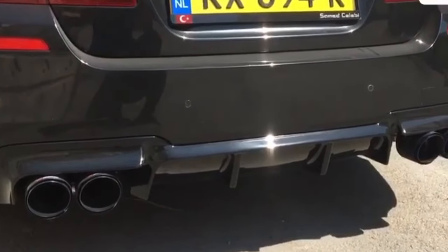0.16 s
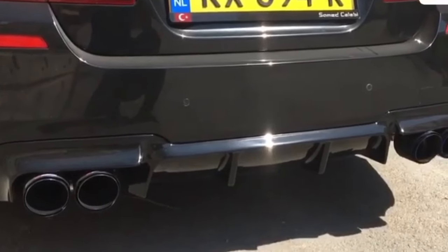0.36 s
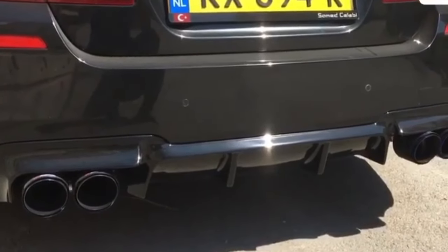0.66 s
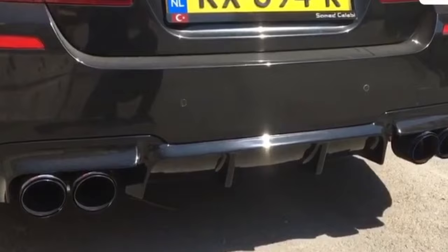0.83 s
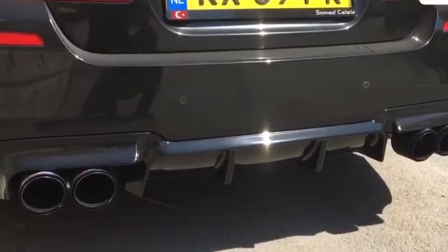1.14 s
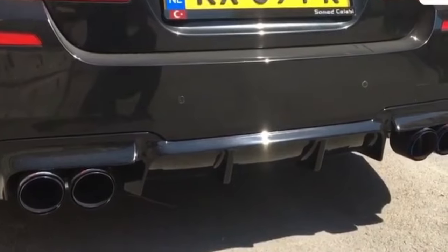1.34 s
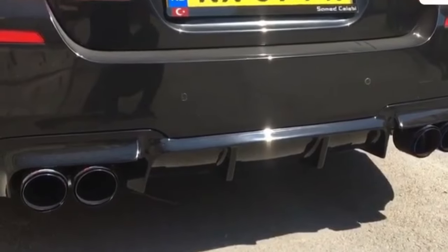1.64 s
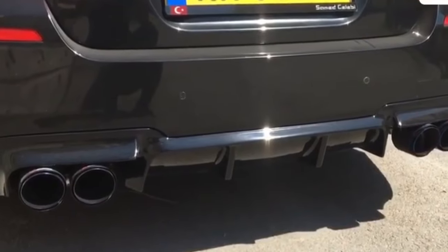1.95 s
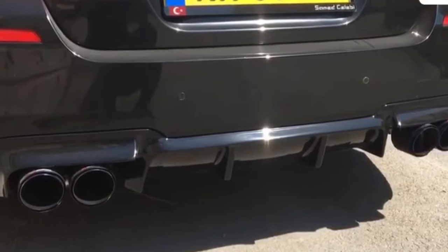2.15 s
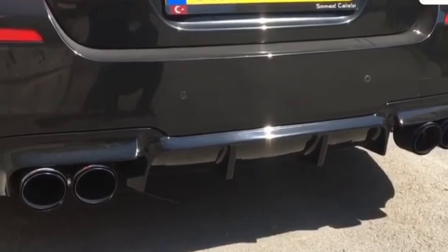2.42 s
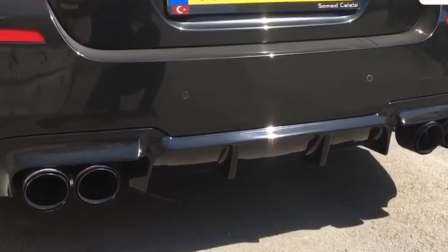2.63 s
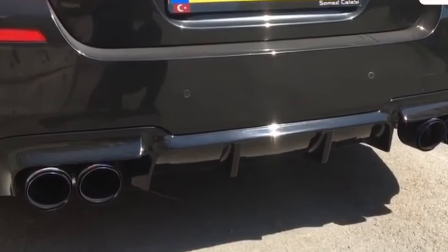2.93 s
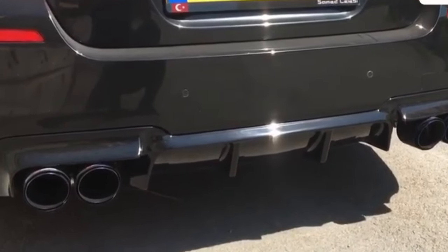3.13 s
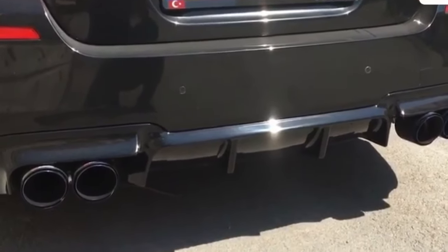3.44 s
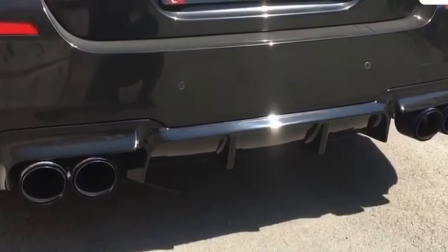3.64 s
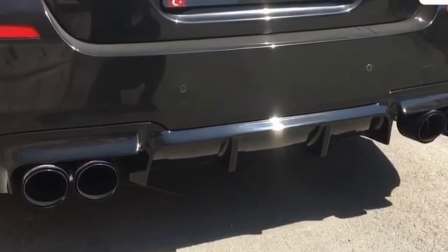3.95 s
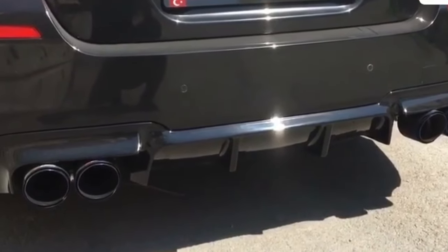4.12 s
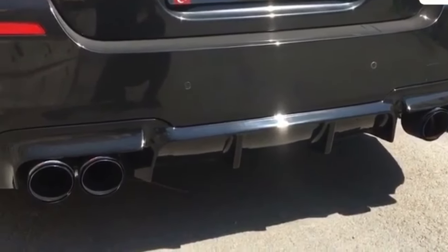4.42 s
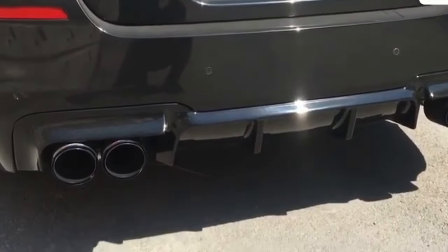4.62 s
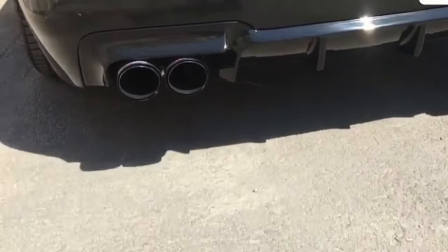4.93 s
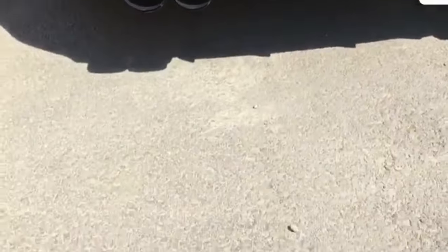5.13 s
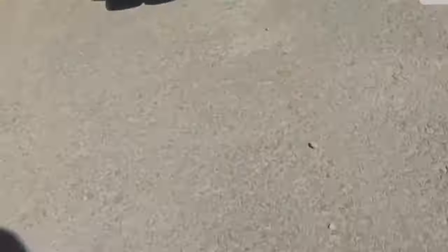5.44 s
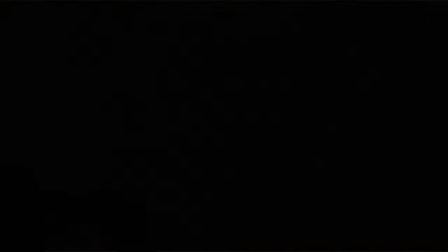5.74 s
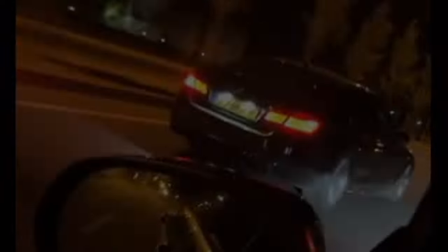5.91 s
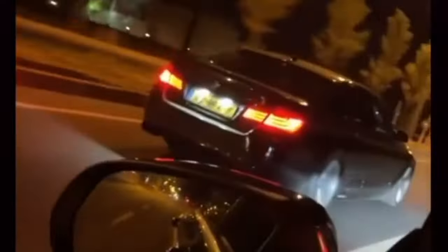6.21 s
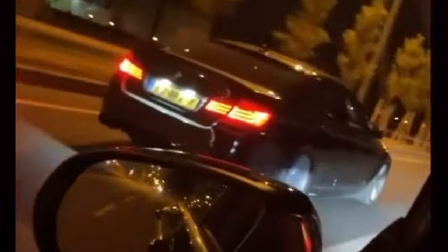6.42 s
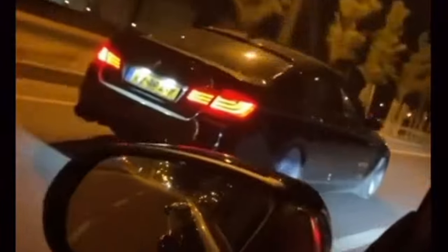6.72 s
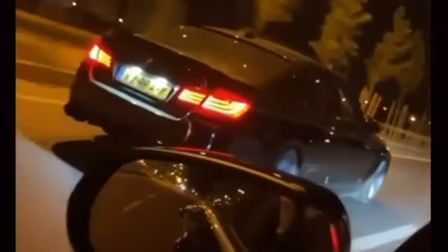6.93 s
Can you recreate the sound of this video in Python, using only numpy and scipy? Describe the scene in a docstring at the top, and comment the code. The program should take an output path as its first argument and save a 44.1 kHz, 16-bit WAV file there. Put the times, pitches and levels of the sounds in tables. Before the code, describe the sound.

From the start, a six-cylinder car idles with the microphone close to the tailpipes. The sound is a deep, loping throb, each pulse carrying a soft puff of gas and a hollow knock over a low burble. The revs sink slowly, and from about 3.5 seconds the idle is lower and more uneven. Between 5.4 and 6.4 seconds it crossfades to the same car on the road, heard from a car alongside. The engine drones and rises slightly as it pulls, with broad road roar, a bright flickering hiss with faint breathy whistles, and low wind rumble. From 5.9 seconds the exhaust fires about a dozen irregular pops, each a crack with a thump, quickly growing loud. Gusts buffet the microphone from 6.3 seconds, and a stone clicks once on the bodywork near 6.4. The throttle lifts at 6.8 seconds, and pops continue until the end, just after 7.

```python
"""A deep, loping six-cylinder idle, with the microphone close to the tailpipes. Each firing pulses through
the pipe resonances and leaves a puff of gas and a hollow knock; the revs slowly sink.
After five seconds the scene fades to the same car on the road, heard from a car alongside: engine orders,
road roar, bright hiss, wind buffeting the microphone, pops of unburnt fuel and one stone on the bodywork."""
import sys
import numpy as np
from scipy import signal
from scipy.io import wavfile

SR = 44100
rng = np.random.default_rng(int(sys.argv[2]) if len(sys.argv) > 2 else 0)


def to_wav(sig):
    """Store sig (one row per channel, or 1-D mono) as 16-bit WAV at the path in sys.argv[1].

    Samples outside -1..1 are clipped; the rate is SR.
    """
    pcm = np.clip(np.atleast_2d(sig), -1, 1) * 32767
    pcm = np.round(pcm).astype(np.int16)
    wavfile.write(sys.argv[1], SR, pcm.T)  # frames by channels


N = 311787
ROAD_N = 2 * SR   # the road is computed for the last two seconds
IDLE_STEPS_HZ = (46, 50, 53)   # firing rates at slow, middle and fast idle
FIRINGS = np.arange(-6, 360)   # firing numbers, from one engine cycle before the start


def from_db(db):
    """Decibels to gain."""
    return 10 ** (np.asarray(db) / 20)


def rms_one(x):
    """Scale to rms 1."""
    return x / np.sqrt(np.mean(x ** 2) + 1e-20)


def in_time(rows):
    """Join (time_s, value) points into one value a sample."""
    return np.interp(np.arange(N) / SR, *np.transpose(rows))


def drift(rate_hz, size=N):
    """Slow random wander with a spread of about 1."""
    r = np.exp(-80 * np.pi * rate_hz / SR)   # one step every 40 samples
    slow = signal.lfilter([1], [1, -2 * r, r * r], rng.standard_normal(size // 40 + 2002))[2000:]
    return np.interp(np.arange(size) / 40, np.arange(len(slow)), rms_one(slow))


def coloured(spectrum, flicker_db, rate_hz, size=N):
    """Third-octave bands of noise that flicker partly together, partly alone; rms 1."""
    hz, db = np.transpose(spectrum)
    edges = 14 * 2 ** np.arange(0, 10.3, 1 / 3)
    white = rng.standard_normal((2, size))
    together, out = drift(rate_hz, size), 0
    for k, (low, high) in enumerate(zip(edges, edges[1:])):
        centre = np.sqrt(low * high)
        if hz[0] < centre < hz[-1]:
            band = signal.sosfilt(signal.butter(2, [low, high], "band", fs=SR, output="sos"), white[k % 2])
            band_db = np.interp(np.log(centre), np.log(hz), db)
            out += band * from_db(band_db + flicker_db * (2.7 * together + drift(rate_hz, size)))
    return rms_one(out)


def resonate(x, hz, width_hz):
    """Two equal resonators in series, gain 1 at the peak."""
    r = np.exp(-np.pi * width_hz / SR)
    b, a = [(1 - r * r) / 2, 0, (r * r - 1) / 2], [1, -2 * r * np.cos(2 * np.pi * hz / SR), r * r]
    return signal.lfilter(b, a, signal.lfilter(b, a, x))


def firing_note(firing_hz, cylinder_db, early_rad, stray_db, stray_rad):
    """Six firing orders lagged by pipe resonances; returns the note and the valve's phase in firings."""
    # what the exhaust passes at each speed: firing_hz, then rms level_db of orders 1 to 6
    exhaust_levels = [(45.6, -13.5, -21.5, -38.5, -39, -52.5, -45),
                      (47.24, -13, -20, -36.5, -33.5, -47, -45.5), (48.8, -14, -16, -31.5, -33.5, -40, -46),
                      (50.25, -13.5, -18, -33, -31.5, -37.5, -50.5),
                      (51.53, -12.5, -18, -34, -35.5, -41.5, -58),
                      (52.5, -13.5, -17.5, -40.5, -40.5, -44, -54.5)]
    # pipe resonance beside each order: pitch_hz, width_hz, polarity, share of the unevenness
    pipe_modes = [(49.5, 7, 1, .04), (99, 16, -1, .25), (165, 20, 1, .6), (186, 12, -1, .85),
                  (236, 14, -1, .6), (285, 20, 1, 1.2)]
    # how much the cylinders differ (negative turns the weak one strong): time_s, factor
    lope_curve = [(1.1, -.65), (1.6, -.3), (3.3, -.25), (3.7, 1)]
    lope = in_time(lope_curve)
    firing = np.cumsum(firing_hz) / SR - .465
    uneven_db = lope * np.interp(firing - .35, FIRINGS, cylinder_db) + np.interp(firing, FIRINGS, stray_db)
    wobble = lope * np.interp(firing, FIRINGS, early_rad) + np.interp(firing, FIRINGS, stray_rad)
    lags = [np.arctan(2 * (k * firing_hz - hz) / width) for k, (hz, width, *_) in enumerate(pipe_modes, 1)]
    valve = firing + lags[0] / (2 * np.pi)   # the first order trails the valve by its lag
    rates_hz, *orders_db = np.transpose(exhaust_levels)
    note = 0
    for k, (db, lag, (_, _, polarity, share)) in enumerate(zip(orders_db, lags, pipe_modes), 1):
        peak = np.sqrt(2) * from_db(np.interp(firing_hz, rates_hz, db) + share * uneven_db)
        note += polarity * peak * np.cos(2 * np.pi * k * valve - lag + share * wobble)
    return note, valve


def tailpipe_knock(firing_hz, cycle, strength_db):
    """A burst of gas rings the tailpipe on each firing; the wave comes back half a cycle later."""
    # tailpipe ring: pitch_hz, nominal_width_hz, relative_db
    ring_modes = [(570, 36, 1.5), (621, 46, 3.5)]
    burst = cycle * np.exp(-cycle / .14) / .05
    echo = np.exp(4.7 * (np.cos(2 * np.pi * (cycle - .65)) - 1))
    gas = (.3 + (burst + .4 * echo) * from_db(strength_db)) * rng.standard_normal(N)
    ring = sum(from_db(db) * resonate(gas, hz, 1.6 * width) for hz, width, db in ring_modes)
    return from_db(np.interp(firing_hz, IDLE_STEPS_HZ, (-52, -50.5, -51.5))) * rms_one(ring)


def tailpipe_puffs(firing_hz, cycle, opens, low_db, high_db):
    """Each puff strikes every tip mode at its own moment and strength; leaking gas keeps them sounding."""
    # modes of the tailpipe tips: pitch_hz, nominal_width_hz, fast_idle_relative_db, slow_idle_relative_db
    tip_modes = [(345, 51, 2, 8.5), (457, 16, -7, 2), (806, 39, 2, -2), (977, 130, -0.5, -4),
                 (1086, 280, -5, -3.5), (1245, 150, -4.5, 0.5), (1466, 110, -2, -3.5), (1910, 110, -8, -13),
                 (2130, 100, -19, -14), (2530, 120, -18.5, -14), (2880, 74, -19, -25),
                 (3090, 91, -22.5, -27.5), (4010, 350, -25.5, -28.5)]
    fast = np.clip((firing_hz - 46.5) / 4, 0, 1)
    leak = .027 * (.5 + np.exp(-cycle / .2))
    out = 0
    for hz, width, fast_db, slow_db in tip_modes:
        late, strength = rng.standard_normal((len(opens), 2)).T
        strikes = np.clip(opens + (np.abs(late) * .0008 * SR).astype(int), 0, N - 1)
        gas = leak * rng.standard_normal(N)
        gas[strikes] += np.sign(late) * from_db((low_db if hz < 1050 else high_db) + 2.8 * strength)
        out += from_db(slow_db + fast * (fast_db - slow_db)) * resonate(gas, hz, 1.5 * width)
    return from_db(np.interp(firing_hz, IDLE_STEPS_HZ, (-52, -50.5, -47.5))) * rms_one(out)


def gas_burble():
    """Flowing exhaust gas fills in low noise between the orders."""
    # gas flow spectrum: frequency_hz, relative_density_db
    spectrum = [(15, -14), (30, -4), (70, 5), (120, 2.5), (180, -8), (300, -10), (450, -29.5),
                (1500, -34.5), (3000, -55.5)]
    return from_db(-35) * coloured(spectrum, flicker_db=.5, rate_hz=1.2)


def street_hiss():
    """Faint, steady hiss of the street around the car."""
    # street spectrum: frequency_hz, relative_density_db
    spectrum = [(1470, -34.5), (2500, -3.5), (3410, -10), (4000, -6.5), (13100, -11), (14100, -20),
                (15300, -54)]
    return from_db(-70) * coloured(spectrum, flicker_db=0, rate_hz=8.7)


def idle():
    """Close to the tailpipes: six unequal cylinders fire in turn, no two firings quite alike."""
    # engine speed: time_s, firing_hz
    idle_speed = [(0.0, 52.64), (0.71, 53.09), (0.84, 52.36), (1.87, 50.34), (2.29, 51.02), (2.65, 49.94),
                  (3.17, 50.21), (3.61, 47.31), (4.24, 46.01), (5.18, 45.27), (5.46, 45.85), (5.8, 44.95),
                  (6.0, 45.4)]
    # offsets of each cylinder: note_db, early_rad (both at full lope), low_puff_db, high_puff_db, knock_db
    cylinders = [(4, .1, -1.5, -.5, -2), (0, .3, -4.5, -2.5, -1.5), (0, .2, 0, .5, -2), (-1, .1, 5, -.5, 1),
                 (-12, 0, 0, 1, 4), (4, -.8, 0, 1.5, -1)]
    firing_hz = in_time(idle_speed)
    note_db, early_rad, low_db, high_db, knock_db = np.transpose(cylinders)[:, FIRINGS % 6]
    scatter = rng.standard_normal((len(FIRINGS), 4)) * (.9, .14, 1, 1.5)
    stray_db, stray_rad, knock_accent_db, puff_accent_db = scatter.T
    note, valve = firing_note(firing_hz, note_db, early_rad, stray_db, stray_rad)
    cycle = (valve + .11) % 1   # 0 to 1 from one firing to the next
    which = np.floor(valve + .13).astype(int) - FIRINGS[0]   # index into FIRINGS
    opens = np.flatnonzero(np.diff(which) > 0)   # samples where a valve opens
    knock = tailpipe_knock(firing_hz, cycle, (knock_db + knock_accent_db)[which])
    puff_db = [(db + puff_accent_db)[which[opens]] for db in (low_db, high_db)]
    puffs = tailpipe_puffs(firing_hz, cycle, opens, *puff_db)
    return note + knock + puffs + gas_burble() + street_hiss()


def engine_orders(load):
    """Harmonics of the engine on the road: each wavers a little, and their balance follows the load."""
    # rising engine speed: time_s, fundamental_hz
    road_speed = [(5.7, 33.4), (6.16, 33.87), (6.6, 34.3), (6.82, 34.8), (7.07, 35.2)]
    # orders that sound: multiple of the fundamental
    multiples = [6, 12, 15, 16, 18, 20, 22, 23, 24, 26, 28, 32, 38]
    # relative level of each order: cruising_db, under_load_db, off_throttle_db
    order_levels = [(-4, -10, -2.5), (1, -13, -2.5), (-11, -11.5, -13), (-16, -20, -7.5), (-3.5, -15, -8),
                    (-8, -7, -13), (-5.5, -12.5, -11), (-15, -22, -14), (-10, -18, -7.5), (-5, -8.5, -10),
                    (-13, -17, -13), (-8, -15.5, -23), (-10.5, -23, -37)]
    phase = 2 * np.pi * np.cumsum(in_time(road_speed)[-ROAD_N:]) / SR
    out = 0
    for k, db in zip(multiples, order_levels):
        gain = from_db(np.interp(load, range(3), db) + 1.7 * drift(7, ROAD_N))
        out += gain * np.cos(k * phase + .25 * drift(9, ROAD_N) + rng.uniform(0, 2 * np.pi))
    return from_db(np.interp(load, range(3), (-32.5, -19.5, -30))) * out


def bright_hiss(load):
    """Flickering hiss with two breathy whistles that are strongest under load."""
    # hiss spectrum: frequency_hz, relative_density_db
    spectrum = [(1180, -29.5), (2000, -5.5), (3360, -9), (3790, -7.5), (4450, -9.5), (5370, -10.5),
                (5990, -13.5), (8000, -16.5), (10200, -32), (13300, -24), (15300, -40)]
    # swell of the hiss: time_s, level_db
    swell = [(5.69, -48.5), (5.77, -44), (5.97, -45.5), (6.06, -42.5), (6.19, -43.5), (6.279, -39.5),
             (6.41, -43), (6.69, -40.5), (6.82, -42.5), (6.84, -46), (7.07, -42.5)]
    # narrow bands of hiss: pitch_hz, width_hz, level_db against the hiss under load
    whistles = [(1740, 130, -5), (3750, 260, -6)]
    hiss = coloured(spectrum, flicker_db=.6, rate_hz=13, size=ROAD_N)
    for hz, width, db in whistles:
        gain = from_db(db - 4.5 * np.abs(load - 1) + 2 * drift(12, ROAD_N))
        hiss += gain * rms_one(resonate(rng.standard_normal(ROAD_N), hz, width))
    return from_db(in_time(swell)[-ROAD_N:]) * hiss


def road_roar(load):
    """Low, broad roar of the road, louder while the engine pulls."""
    # roar spectrum: frequency_hz, relative_density_db
    spectrum = [(88, -26.5), (150, 4), (356, -13), (404, -3.5), (458, -6), (889, -2.5), (1170, -19.5),
                (1280, -9), (3000, -26.5), (3900, -59), (6600, -120)]
    level_db = np.interp(load, range(3), (-33, -27, -33))
    return from_db(level_db) * coloured(spectrum, flicker_db=.7, rate_hz=20, size=ROAD_N)


def wind_rumble():
    """Air rushing over the microphone keeps up a fluttering rumble."""
    # wind spectrum: frequency_hz, relative_density_db
    spectrum = [(15, -39.5), (25, -7.5), (59, 4), (86, 5.5), (134, -9.5), (210, -20.5), (250, -15),
                (320, -33.5), (550, -120)]
    return from_db(-27) * coloured(spectrum, flicker_db=1, rate_hz=19, size=ROAD_N)


def driving():
    """From the car alongside: the engine cruises, pulls, then comes off the throttle."""
    # engine load: time_s, state (0 cruising, 1 under load, 2 off the throttle)
    load_curve = [(5.9, 0), (6.7, 1), (6.822, 1), (6.84, 2)]
    load = in_time(load_curve)[-ROAD_N:]
    road = engine_orders(load) + bright_hiss(load) + road_roar(load) + wind_rumble()
    return np.pad(road, (N - ROAD_N, 0))


def exhaust_pops():
    """Unburnt fuel lights in the pipe: a crack, then a rough thump that drops as the lows arrive last."""
    # pops: start_s, thump_db, crack_db, crack_top_hz, crack_length_s
    pops = [(5.922, -26, -40, 900, 0.0036), (6.005, -23, -33, 1800, 0.0041),
            (6.222, -14.5, -23, 990, 0.0029), (6.378, -12.5, -24, 1580, 0.011),
            (6.537, -10, -16.5, 1300, 0.0031), (6.65, -9, -20, 910, 0.0054),
            (6.671, -12, -20.5, 1290, 0.0039), (6.758, -15, -35, 900, 0.0047),
            (6.815, -9.5, -23.5, 2379, 0.013), (6.866, -16.5, -26, 900, .003),
            (6.948, -8, -16.5, 3280, 0.0087), (7.023, -17.5, -33, 1517, 0.0035)]
    thump_s, rough_db, end_hz, sweep_hz = .017, 2.4, 65, 720
    out, t = np.zeros(N + SR), np.arange(SR // 12) / SR
    for start_s, thump_db, crack_db, top_hz, crack_s in pops:
        noise = rng.standard_normal((2, len(t)))
        dull_noise = signal.lfilter([1], [1, -.75], noise[0])
        crack = signal.sosfilt(signal.butter(3, [300, top_hz], "band", fs=SR, output="sos"), dull_noise)
        crack = rms_one(crack) * np.minimum(t / .001, 1) * np.exp(-(t / crack_s) ** 3)
        rough = rms_one(signal.sosfilt(signal.butter(2, 200, fs=SR, output="sos"), noise[1]))
        pitch_hz = (end_hz + sweep_hz * np.exp(-t / .004)) * from_db(rough_db * rough)
        envelope = np.minimum(t / .002, 1) * np.exp(-(t / thump_s) ** 2)
        thump = envelope * np.sin(2 * np.pi * np.cumsum(pitch_hz) / SR)
        out[round(start_s * SR):][:len(t)] += from_db(crack_db) * crack
        out[round((start_s + .6 * crack_s) * SR):][:len(t)] += from_db(thump_db) * thump
    return out[:N]


def wind_gusts():
    """Lumps of wind hit the microphone: low noise around a pitch of its own, swelling and dying."""
    # gusts: centre_s, level_db, half_length_s, pitch_hz
    gusts = [(6.332, -19, 0.022, 89.5), (6.397, -21, 0.02, 75), (6.499, -16, 0.023, 74),
             (6.56, -22, 0.015, 111), (6.601, -18, 0.018, 70), (6.716, -18, 0.027, 54.7),
             (6.845, -18, 0.023, 50), (6.913, -16.5, 0.035, 57.6), (6.979, -22, .015, 45)]
    out, t = np.zeros(N + SR), np.arange(-(SR // 8), SR // 8) / SR
    for centre_s, db, half_s, hz in gusts:
        swell = np.exp(-(t / half_s) ** 2)
        lump = swell * resonate(rng.standard_normal(2 * len(t)), hz, width_hz=.69 * hz)[len(t):]
        lump *= np.sqrt(np.sum(swell ** 2) / np.sum(lump ** 2))   # as much energy as the swell
        out[round(centre_s * SR) - SR // 8:][:len(t)] += from_db(db) * lump
    return out[:N]


def stone_tick():
    """A stone hits the bodywork with one sharp click."""
    # impact: start_s, peak_db
    ticks = [(6.3625, -19)]
    out = np.zeros(N)
    for start_s, db in ticks:
        out[round(start_s * SR):][:2] += from_db(db) * np.array([1, -.5])
    return out


def scene():
    """The idle fades into the drive, in mono; the pops and the stone stand outside the fade."""
    fade_s = (5.368, 6.36)
    fade = np.interp(np.arange(N) / SR, fade_s, [0, 1])
    car = (1 - fade) * idle() + fade * (driving() + wind_gusts())
    return (car + exhaust_pops() + stone_tick())[None]


def record(dry):
    """The recorder rounds the peaks and cuts the top of the treble."""
    stop_hz = 15400
    rounded = .96 * np.tanh(dry / .89)
    return signal.sosfilt(signal.cheby2(12, 70, stop_hz, fs=SR, output="sos"), rounded)


dry = scene()
out = record(dry)
to_wav(out)
```